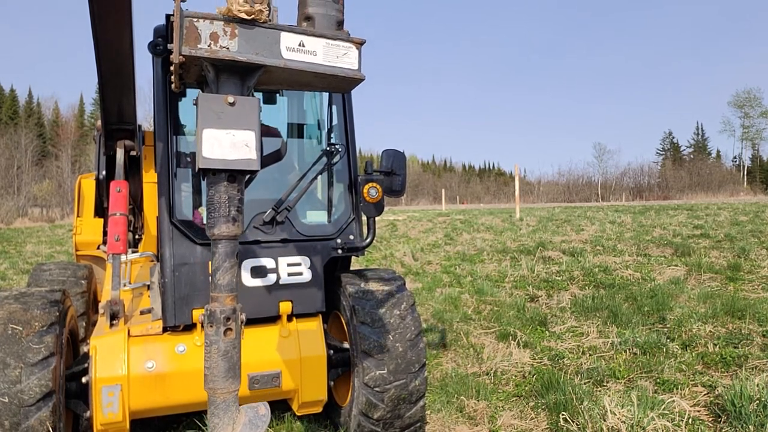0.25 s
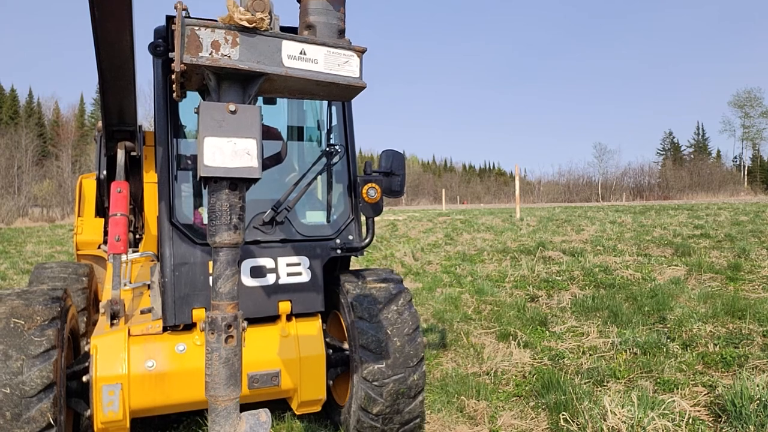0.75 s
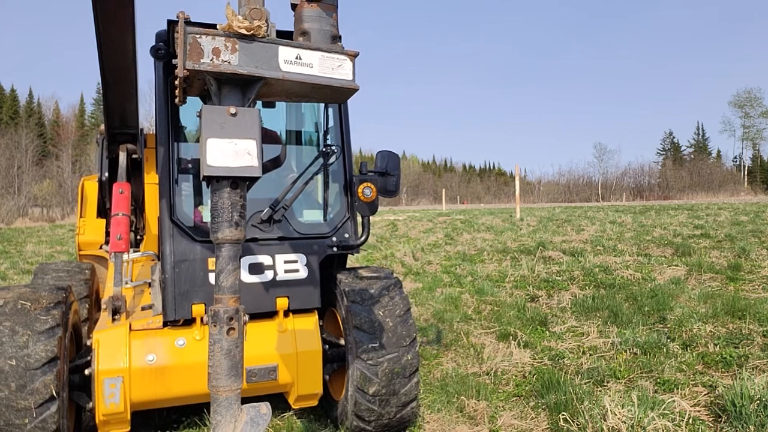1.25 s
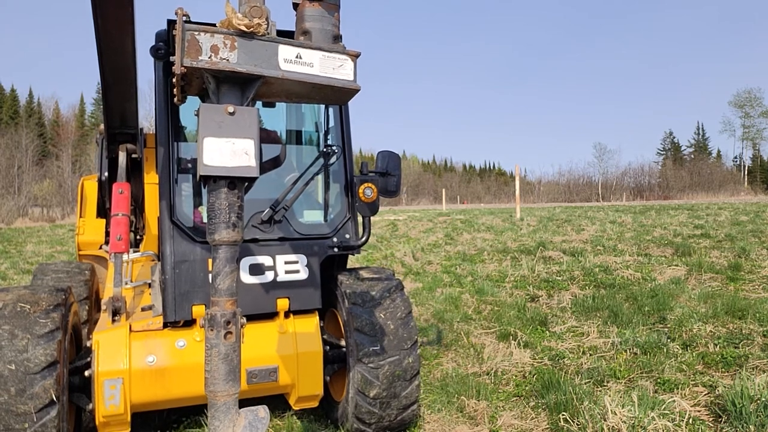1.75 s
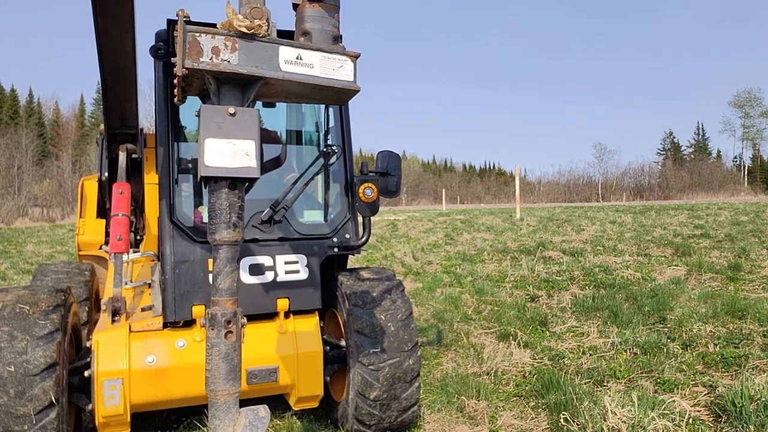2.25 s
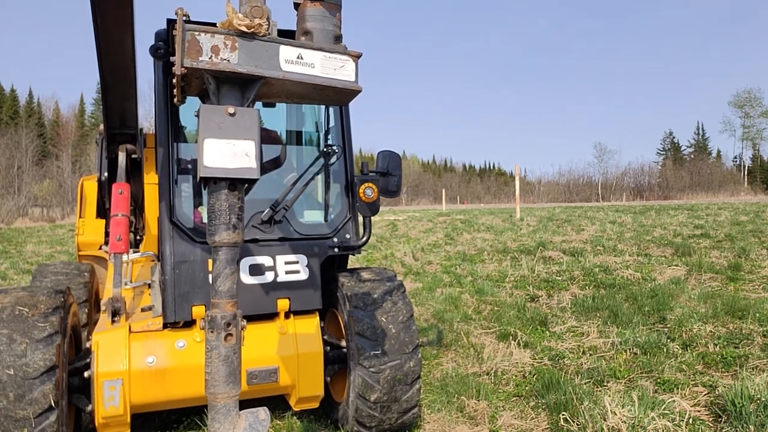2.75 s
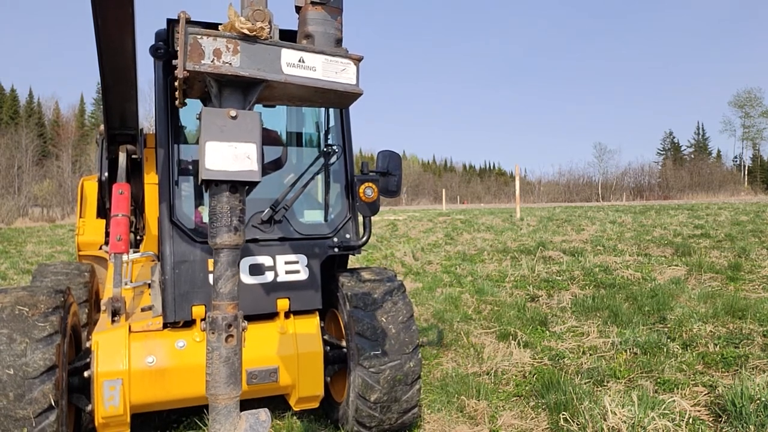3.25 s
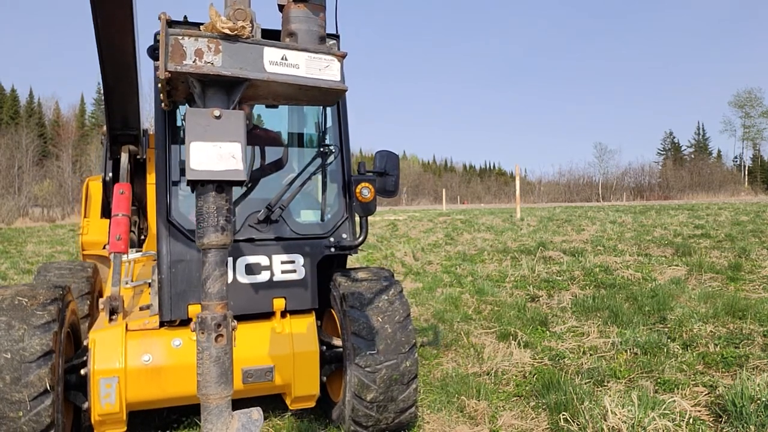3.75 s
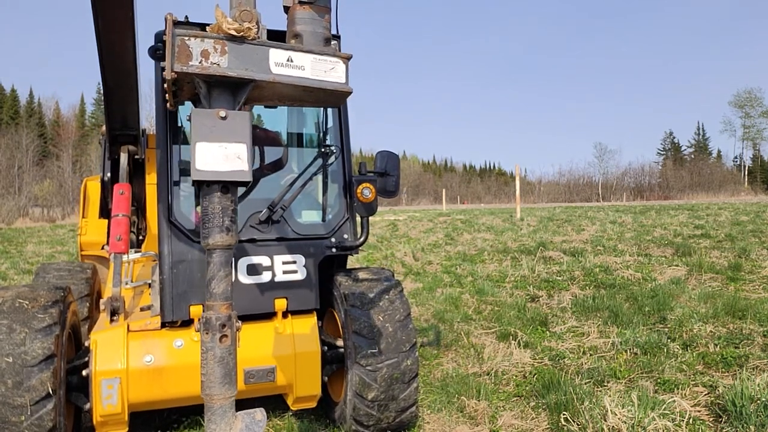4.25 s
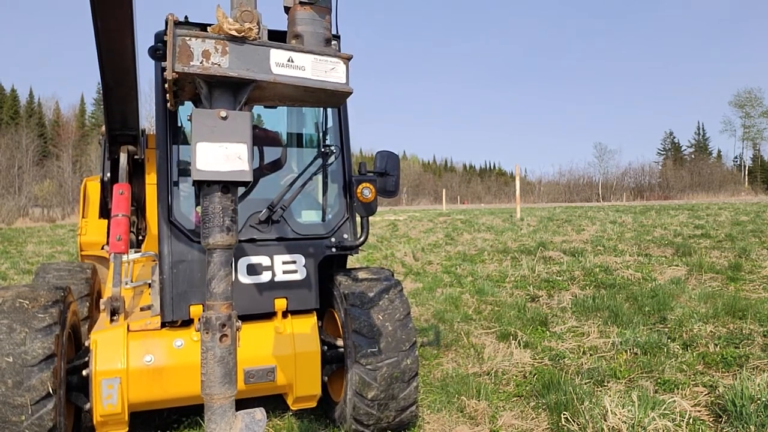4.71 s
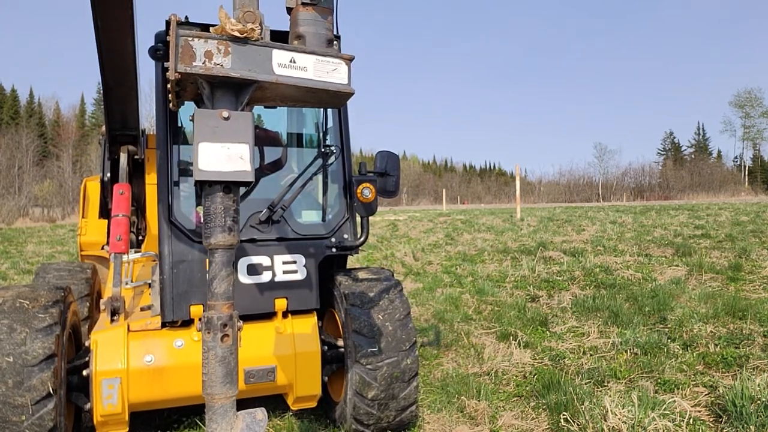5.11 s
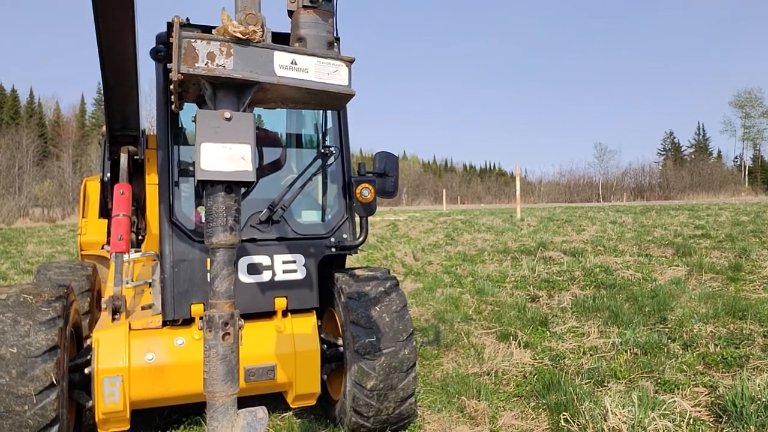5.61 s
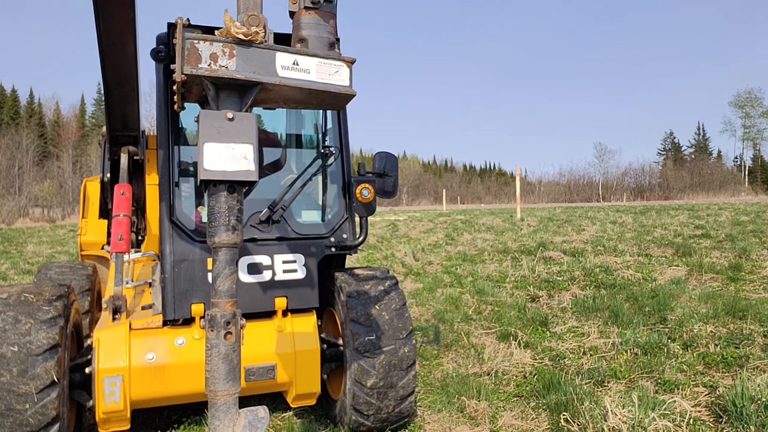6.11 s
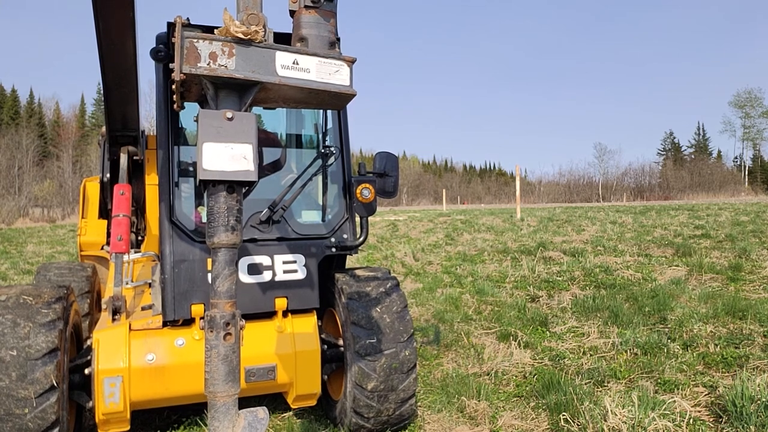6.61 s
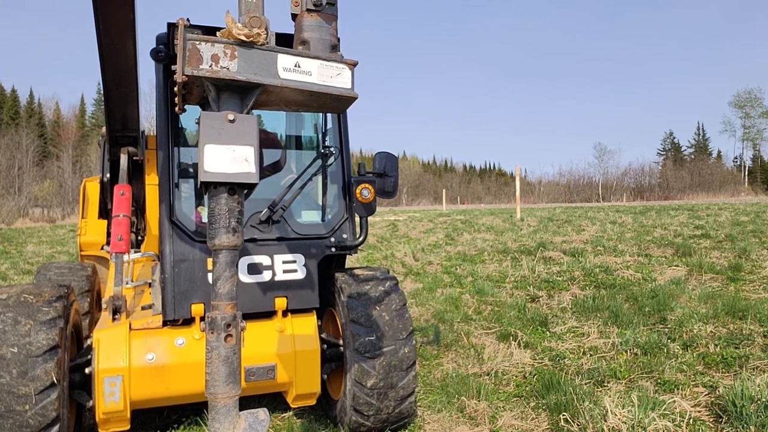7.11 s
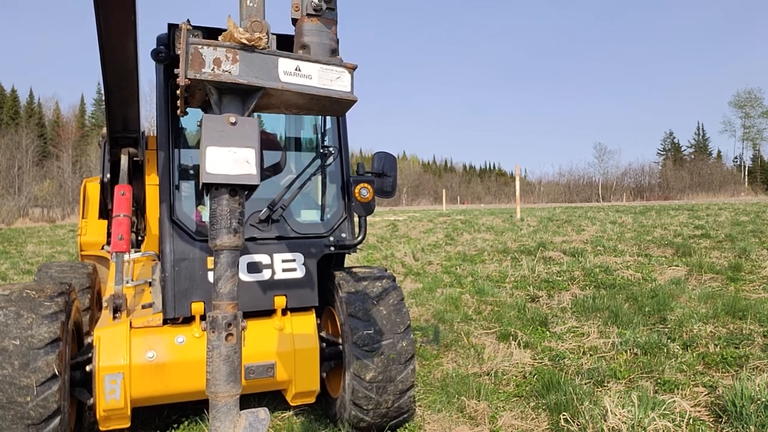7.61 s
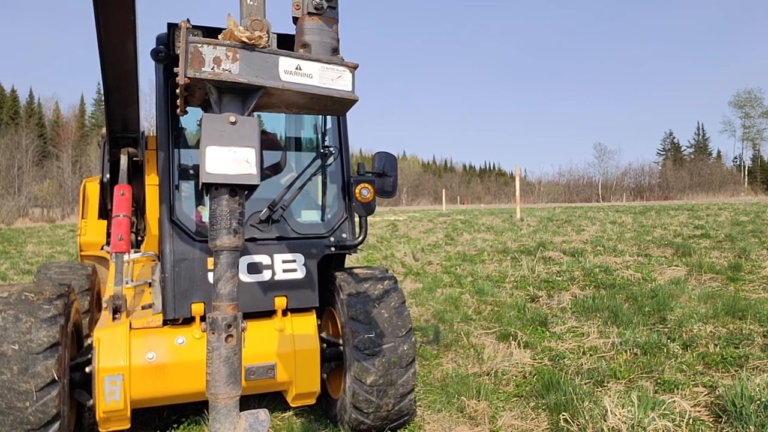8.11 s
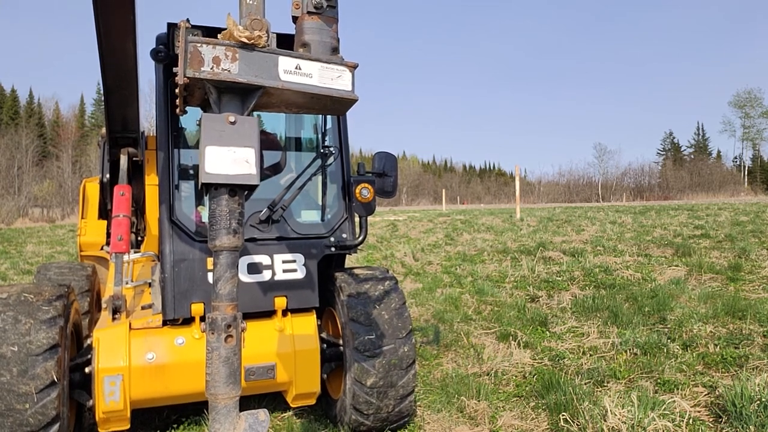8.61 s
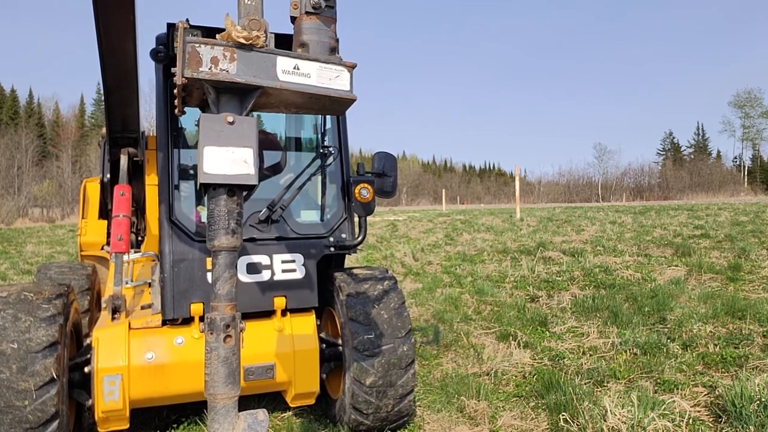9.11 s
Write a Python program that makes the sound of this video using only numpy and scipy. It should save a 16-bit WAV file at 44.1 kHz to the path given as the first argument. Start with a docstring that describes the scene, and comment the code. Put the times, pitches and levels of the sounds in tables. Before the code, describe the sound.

Close diesel engine chugging steadily as it turns a hydraulic auger, with two early metal clanks, light rattling and faint wind.

```python
"""An open field: a skid steer's four-cylinder diesel runs close by, turning its hydraulic auger.
The exhaust throbs, the block clatters at each firing, pump and gears whine; the governor overshoots
after each sag. Oil hisses through a valve; a cooling fan and light wind lie underneath.
The hanging auger mount buzzes with the shaking and clanks twice early on, with a few fainter knocks."""
import sys
import numpy as np
from scipy import signal
from scipy.fft import rfft, irfft, next_fast_len
from scipy.io import wavfile

SR = 44100
rng = np.random.default_rng(int(sys.argv[2]) if len(sys.argv) > 2 else 0)


def pcm_store(signal):
    """Save signal as 16-bit PCM."""
    levels = np.round(np.clip(np.atleast_2d(signal), -1, 1) * 32767)
    wavfile.write(sys.argv[1], SR, levels.astype(np.int16).T)


N = 412776

# left-right coherence: f/Hz, coherence/0-1
COHERENCE = [(90, 0.86), (300, 0.83), (1000, 0.92), (2200, 0.85), (5000, 0.56), (14000, 0.34)]
# left minus right: f/Hz, level/dB
BALANCE_DB = [(85, -1.1), (130, -2.5), (500, -2), (1300, -3.5), (2500, -2.5), (4000, -4.5), (6300, -1.5),
              (7700, -5.5), (9000, 2), (13000, 0.5)]
# governed speed: t/s, speed/rpm
GOVERNED_RPM = [(0.28, 1253.3), (2.2, 1277.8), (5.45, 1275), (6.2, 1285.4), (7.12, 1275.2), (7.91, 1285.9),
                (8.4, 1274.2)]
# load sags: pick-up t/s, half length/s, depth/rpm
LOAD_SAGS = [(1.1, .2, 20.3), (1.84, .23, 9.6), (3.88, .16, 20), (7.32, .21, 9.2)]
# noise spectra: f/Hz, relative density/dB
WIND_SPECTRUM = [(12, -20), (25, -17), (35, -28), (48, 7.5), (70, -9.5), (105, 1.5), (160, -8.5)]
VALVE_SPECTRUM = [(3000, 1), (6000, 1), (9000, 0.5), (11500, -6), (15500, -5)]
HISS_SPECTRUM = [(1500, -8), (2500, 8), (3200, 2.5), (4000, -3), (4900, 5), (5600, 2), (6200, -1.5),
                 (7000, 0.5), (7900, 3.5), (8600, -14.5), (10400, -6.5), (12000, -8.5), (14700, -11),
                 (15600, -11)]
RUMBLE_SPECTRUM = [(50, -24), (85, -15), (130, -3.5), (165, -10.5), (210, -11), (260, -7), (320, -12.5),
                   (385, -14.5), (480, -17.5), (800, -32)]
BLOCK_SPECTRUM = [(350, -36), (500, 1.5), (690, 3.5), (850, -1), (1000, -1), (1150, 0), (1380, -0.5),
                  (1540, -1), (1700, 1), (1860, 1), (2020, -5.5), (2250, -2.5), (2600, -15.5),
                  (4000, -12.5)]
CRACK_SPECTRUM = [(300, -16), (700, -7.5), (1500, 6), (2700, -5), (4200, -5.5), (5600, -2.5), (7800, 0),
                  (9000, -9), (12000, -11), (16000, -21)]
SHUDDER_SPECTRUM = [(250, -4), (650, -8.5), (1000, -8.5), (1500, -13), (2100, -7), (3000, -14), (6000, -23)]
# fan blade tone: t/s, f/Hz, level/dB
FAN_TONE = [(0.0, 440, -36), (0.02, 435.7, -41), (1.12, 439.3, -37.5), (2.66, 429.4, -46.5),
            (4.04, 440, -38), (5.03, 439.4, -40), (8.7, 435, -39.5), (9.31, 437.4, -38.5),
            (9.36, 447.1, -34)]
# steady hum: f/Hz, level/dB
HUM_TONES = [(300, -43), (450, -52)]
# valve openings: t/s, length/s, level/dB
VALVE_OPENINGS = [(-.1, 1.27, -47), (2.778, 0.42, -51), (6.951, .6, -52)]
# pump and drive tones: order (multiple of the four-stroke cycle rate, rounded in use), level/dB,
# lug slope/(dB/rpm), surge gain/dB, waver/dB
PUMP_TONES = [(36, -50.5, 0.4477, 5, 3.5), (42, -60.5, 0.27, 8, 3), (54, -41, -.06, 3, 1.2),
              (64.48, -55, 0.1154, 4, 6.5), (66.7, -56, .2, 0, 2.5), (68.45, -56.5, -0.08, 7, 0.5),
              (72.7, -57, 0, 16, 1.7), (92.36, -55, -0.25, 4, 2.5)]
# pump surges: t/s, half length/s, strength/0-1
PUMP_SURGES = [(.8, 0.14, 0.5), (1.7, 0.28, 0.1), (3.705, 0.23, 0.7), (5.551, 0.48, 0.9), (7.3, 0.48, 0.9),
               (9.15, .3, 0.67)]
# timing gear mesh and sidebands: order, relative level/dB
GEAR_TONES = [(120, -1), (124, 3.5), (128, 8.5), (130, 2.5), (135, 5)]
# gear cover modes: f/Hz, t60/s, level/dB
COVER_MODES = [(1403, 0.011, -48.5), (1856, 0.027, -48.5)]
# loose fitting modes: f/Hz, t60/s, relative level/dB
FITTING_MODES = [(4750, 0.033, 5), (5084, 0.013, 6), (5127, 0.016, 5), (4190, 0.0065, -3),
                 (6500, 0.0065, -6.5), (7770, 0.0045, -3)]
# buzz of the fittings: t/s, base level/dB
BUZZ_DB = [(0, -48.5), (2.2, -44.5), (4.4, -47), (6.2, -48.5), (8, -49.5), (9.2, -46)]
# harder taps of the fittings: t/s, relative level/dB
FITTING_TAPS = [(.409, -40), (0.601, -38), (2.2127, -41), (3.1, -43), (4.6766, -40.5), (4.82, -38),
                (5.3355, -42.5), (5.407, -41), (8.9712, -39), (9.2039, -41)]
# auger linkage knocks: t/s, relative level/dB, low ring and shudder gain/dB, crack t60/s
LINKAGE_KNOCKS = [(0.7873, -14, -1.5, 0.058), (1.1974, -34, 2, 0.084), (1.2247, -30.5, 5, 0.039),
                  (1.273, -34, 0, 0.042), (1.3872, -17, -6, 0.054), (2.8673, -31.5, 1.5, 0.041),
                  (5.866, -33.5, -1, 0.058)]
# steel mount modes: f/Hz, t60/s, relative level/dB
MOUNT_MODES = [(762, 0.64, -16), (1233, 0.26, -9), (1300, 0.58, -11.5), (1530, 0.11, -2), (1646, 0.13, -6),
               (1850, 0.13, -5.5), (2090, 0.057, -19), (4710, 0.11, -15), (4900, 0.046, -25),
               (6050, 0.031, -18), (7150, 0.039, 0.5), (7700, 0.038, -3)]
# knock per cylinder, in firing order: relative level/dB, before weighting
CYLINDER_DB = [-3.5, -4, -3, -2]
# exhaust tones: order, relative level/dB
EXHAUST_TONES = [(4, -16.5), (7, -19.5), (8, -1), (11, -13), (12, 1.5), (13, -8.5), (15, -9), (16, -14),
                 (17, -17), (19, -21.5), (21, -30), (23, -19), (24, -42), (25, -9.5), (26, -24.5),
                 (32, -30), (38, -30.5), (40, -29.5), (47, -28.5)]
# swell of the strongest exhaust tone: t/s, relative level/dB
THROB_DB = [(0.3, -18), (1.0, -21), (1.25, -18.0), (2.0, -17.5), (2.6, -17.5), (3.15, -18.5), (3.45, -17),
            (4.4, -17), (5.05, -20), (5.45, -17), (8.0, -16.5), (8.7, -22), (9.2, -20)]


def from_db(db):
    """Decibels to gain."""
    return 10 ** (np.asarray(db) / 20)


def unit_rms(x):
    """Scale to rms 1."""
    return x / np.sqrt(np.mean(x ** 2) + 1e-20)


def per_sample(rows):
    """Each column of a time table, at every sample."""
    times_s, *columns = np.transpose(rows)
    return [np.interp(np.arange(N) / SR, times_s, column) for column in columns]


def per_bin(points):
    """A table over log frequency, at every FFT bin."""
    hz, value = np.transpose(points)
    return np.interp(np.log(np.fft.rfftfreq(next_fast_len(N), 1 / SR) + 1), np.log(hz), value)


def fft_filter(x, gain):
    """Apply one gain per FFT bin."""
    size = next_fast_len(N)
    return irfft(rfft(x, size) * gain, size)[..., :N]


def colour(x, spectrum):
    """Impose a spectrum that rolls off outside its table; rms 1."""
    (low_hz, low_db), (high_hz, high_db) = spectrum[0], spectrum[-1]
    skirted = [(low_hz / 2, low_db - 50), *spectrum, (high_hz * 2, high_db - 40)]
    return unit_rms(fft_filter(x, from_db(per_bin(skirted))))


def drift(rate_hz):
    """Smooth random wander; rms 1."""
    hop, settle = 40, 2000
    pole = np.exp(-2 * np.pi * hop * rate_hz / SR)
    white = rng.standard_normal(N // hop + settle + 2)
    slow = signal.lfilter([1], [1, -2 * pole, pole * pole], white)[settle:]
    return np.interp(np.arange(N) / hop, np.arange(len(slow)), unit_rms(slow))


def noise_pair():
    """Two independent white noises."""
    return rng.standard_normal((2, N))


def spread(pair):
    """Independent pair to left and right, less coherent in the treble."""
    coherence = per_bin(COHERENCE)
    mid = fft_filter(pair[0], np.sqrt((1 + coherence) / 2))
    side = fft_filter(pair[1], np.sqrt((1 - coherence) / 2))
    return np.array([mid + side, mid - side])


def ring(clicks, hz, t60_s):
    """One mode: a unit click starts a decaying unit sine."""
    r, w = from_db(-60 / (t60_s * SR)), 2 * np.pi * hz / SR
    return signal.lfilter([0, np.sin(w)], [1, -2 * r * np.cos(w), r * r], clicks + 1e-18)


def decay(start_s, t60_s):
    """Envelope: jump, then exponential fall."""
    age_s = np.arange(N) / SR - start_s
    return (age_s >= 0) * from_db(-60 * np.clip(age_s / t60_s, 0, 2))


def engine_rpm():
    """Each load dips the speed; the governor overshoots by as much."""
    rpm = per_sample(GOVERNED_RPM)[0]
    for at_s, half_s, depth_rpm in LOAD_SAGS:
        u = (np.arange(N) / SR - at_s) / half_s
        rpm = rpm + depth_rpm * u * np.exp((1 - u ** 2) / 2)
    return rpm


def firing(cycle, delay_strokes, depth_db, uneven_db, cylinder_weight=0):
    """Four uneven swells per cycle, each rising faster than it falls."""
    strokes = 4 * cycle - delay_strokes + 1
    angle = 2 * np.pi * strokes
    swell = np.sin(angle) + 0.25 * np.sin(2 * angle)
    index = (strokes + 0.25).astype(int)
    strength_db = uneven_db * (2 * rng.random(index[-1] + 1) - 1)[index]
    strength_db += cylinder_weight * np.take(CYLINDER_DB, index, mode="wrap")
    return unit_rms(from_db(depth_db * swell + strength_db * (1 + np.sin(angle)) / 2))


def wind(level_db=-32.5, easing_db_per_s=0.64, gust_db=4.0, gust_hz=1.04, shared=0.21):
    """An easing breeze buffets both microphone ports, partly in common."""
    air = np.sqrt(shared) * rng.standard_normal(N) + np.sqrt(1 - shared) * noise_pair()
    gain = from_db(level_db - easing_db_per_s * np.arange(N) / SR + gust_db * drift(gust_hz))
    return gain * colour(air, WIND_SPECTRUM)


def fan(waver_db=1.0):
    """Blade tone of a fan on its own motor, plus a faint hum."""
    blade_hz, level_db = per_sample(FAN_TONE)
    blades = from_db(level_db + waver_db * drift(15.0)) * np.sin(2 * np.pi * np.cumsum(blade_hz) / SR)
    hum = sum(from_db(db) * np.sin(2 * np.pi * hz * np.arange(N) / SR) for hz, db in HUM_TONES)
    return np.sqrt(2) * (blades + hum)


def valve(ramp_s=0.08):
    """Oil hisses while the valve is open."""
    t = np.arange(N) / SR
    flow = sum(from_db(db) * np.clip(np.minimum(t - at_s, at_s + length_s - t) / ramp_s, 0, 1)
               for at_s, length_s, db in VALVE_OPENINGS)
    return flow * colour(spread(noise_pair()), VALVE_SPECTRUM)


def engine_hiss(cycle, lug_rpm, level_db=-43.5, db_per_rpm=-0.0161):
    """Treble noise pulsing at each firing."""
    pulses = noise_pair() * firing(cycle, delay_strokes=0.015, depth_db=2.5, uneven_db=3.5)
    return from_db(level_db + db_per_rpm * lug_rpm) * colour(spread(pulses), HISS_SPECTRUM)


def backlash(cycle, lug_rpm, turn_db=8.0, cycle_db=2.0, peak_cycles=0.31, db_per_rpm=-0.1448):
    """Gear play rattles the cover once per crank turn, harder every second turn."""
    angle = 2 * np.pi * (cycle - peak_cycles)
    contacts = spread(noise_pair()) * from_db(turn_db * np.cos(2 * angle) + cycle_db * np.cos(angle))
    cover = sum(from_db(db) * unit_rms(ring(contacts, hz, t60_s)) for hz, t60_s, db in COVER_MODES)
    return from_db(db_per_rpm * lug_rpm) * cover


def gears(cycle, lug_rpm, level_db=-43.0, db_per_rpm=-0.5, peak_cycles=0.357, waver_db=2.0):
    """Timing gears sing, meshing hardest once per crank turn; load quiets them."""
    angle = 2 * np.pi * (cycle - peak_cycles)
    mesh = sum(from_db(db + waver_db * drift(4.9)) * np.cos(order * angle) for order, db in GEAR_TONES)
    torque = 1 + 0.28 * np.cos(2 * angle)
    return from_db(level_db + db_per_rpm * np.maximum(lug_rpm, 0)) * unit_rms(mesh * torque)


def hydraulics(cycle, lug_rpm, drone_db=-40.5, drone_waver_db=2.2, beat_db=13.5, beat_s=3.73, top_s=0.22):
    """Piston pump and drive whine, varying with load and surges; the drive's drone beats slowly."""
    t = np.arange(N) / SR
    surge = sum(strength * np.exp(-((t - at_s) / half_s) ** 2) for at_s, half_s, strength in PUMP_SURGES)
    fade_db = beat_db * np.sin(np.pi * (t - top_s) / beat_s) ** 2
    drone = from_db(drone_db - fade_db + drone_waver_db * drift(5)) * np.sin(2 * np.pi * 33 * cycle)
    whine = 0
    for order, db, db_per_rpm, surge_db, waver_db in PUMP_TONES:
        gain = from_db(db + db_per_rpm * lug_rpm + surge_db * surge + waver_db * drift(1.7))
        whine += gain * np.sin(2 * np.pi * round(order) * cycle)
    return np.sqrt(2) * (drone + whine)


def fittings(cycle, lug_rpm, db_per_rpm=-0.1124, tap_db=4.0, tap_t60_s=0.086):
    """Firings shake loose steel into tiny contacts, louder at speed, with some harder taps."""
    shaking = firing(cycle, delay_strokes=0.063, depth_db=3.5, uneven_db=8.0)
    force = from_db(per_sample(BUZZ_DB)[0] + db_per_rpm * lug_rpm) * shaking
    force += sum(from_db(db + tap_db) * decay(at_s, tap_t60_s) for at_s, db in FITTING_TAPS)
    contacts = spread(noise_pair()) * force
    rings = sum(from_db(db) * unit_rms(ring(contacts, hz, t60_s)) * (-1) ** k
                for k, (hz, t60_s, db) in enumerate(FITTING_MODES))
    return unit_rms(rings) * np.std(contacts)


def linkage(crack_db=-4.5, bounce_db=-5.5, bounce_s=0.0084, shudder_db=-4.5, ring_db=-2.5, low_hz=3000):
    """Play in the mount closes with a crack and a bounce; the arms shudder, the steel rings."""
    crack = shudder = 0
    for at_s, db, low_db, t60_s in LINKAGE_KNOCKS:
        bounce = from_db(bounce_db) * decay(at_s + bounce_s, t60_s)
        crack += from_db(db + crack_db) * (decay(at_s, t60_s) + bounce)
        shudder += from_db(db + low_db + shudder_db) * decay(at_s, t60_s=0.18)
    out = crack * colour(spread(noise_pair()), CRACK_SPECTRUM)
    out += shudder * colour(spread(noise_pair()), SHUDDER_SPECTRUM)
    at_s, db, low_db, _ = np.transpose(LINKAGE_KNOCKS)
    for hz, t60_s, mode_db in MOUNT_MODES:
        strength = from_db(db + ring_db + mode_db + low_db * (hz < low_hz))
        clicks = np.zeros(N)
        clicks[(at_s * SR).astype(int)] = strength * rng.choice([-1, 1], len(at_s))
        out += ring(clicks, hz, t60_s)
    return out


def rumble(level_db=-32.5):
    """Steady low noise under the exhaust tones."""
    return from_db(level_db) * colour(spread(noise_pair()), RUMBLE_SPECTRUM)


def block(cycle, level_db=-36.0, repeat_share=0.65, linger_hz=800):
    """Combustion knock in block and panels: part repeats every cycle, part is new."""
    patterns = rng.standard_normal((2, 4096))
    position = cycle % 1 * patterns.shape[1]
    repeating = unit_rms(np.array([np.interp(position, np.arange(len(p)), p) for p in patterns]))
    knock = np.sqrt(repeat_share) * repeating + np.sqrt(1 - repeat_share) * noise_pair()
    pulsing = knock * firing(cycle, delay_strokes=0.35, depth_db=3.5, uneven_db=2.0, cylinder_weight=1.5)
    # low panel modes ring on between firings
    lowpass = 1 / (1 + (np.fft.rfftfreq(next_fast_len(N), 1 / SR) / linger_hz) ** 4)
    clatter = fft_filter(knock, lowpass) + fft_filter(pulsing, 1 - lowpass)
    return from_db(level_db) * colour(spread(clatter), BLOCK_SPECTRUM)


def exhaust(cycle, lug_rpm, level_db=-18.5, waver_db=0.56, pulse_cycles=0.016,
            pipe_hz=165, pipe_width_hz=100, scatter_hz=480):
    """Uneven firings fill in the cycle's harmonics; the pipe's resonance shifts their phases."""
    throb_db = per_sample(THROB_DB)[0]
    throb_db -= throb_db.mean()
    out = 0
    for order, db in EXHAUST_TONES:
        hz = order * cycle[-1] * SR / N
        lag_rad = np.arctan((hz ** 2 - pipe_hz ** 2) / (hz * pipe_width_hz))
        scatter_rad = rng.normal() * (hz / scatter_hz) ** 2  # short waves arrive by many paths
        boom_band = np.exp(-((hz - 85) / 20) ** 2)
        throb_band = np.exp(-((hz - 128) / 14) ** 2)
        bark_band = np.exp(-((hz - 265) / 40) ** 2)
        load_db = lug_rpm * (0.0931 * bark_band - 0.0932 * boom_band)  # load trades boom for bark
        gain = from_db(db + waver_db * drift(1.07) + load_db + throb_db * throb_band)
        out += gain * np.cos(2 * np.pi * order * (cycle - pulse_cycles) - lag_rad + scatter_rad)
    return from_db(level_db) * unit_rms(out)


def scene(easy_rpm=1278, full_lug_rpm=25):
    """Crank angle drives engine and pump; speed lost to load (lug) colours them."""
    rpm = engine_rpm()
    lug_rpm = np.minimum(easy_rpm - rpm, full_lug_rpm)
    cycle = 0.027 + np.cumsum(rpm) / (2 * 60 * SR)  # two crank turns per cycle
    tones = exhaust(cycle, lug_rpm) + hydraulics(cycle, lug_rpm) + gears(cycle, lug_rpm) + fan()
    noise = rumble() + engine_hiss(cycle, lug_rpm)
    clatter = block(cycle) + backlash(cycle, lug_rpm) + fittings(cycle, lug_rpm)
    return tones + noise + clatter + valve() + linkage() + wind()


def record(dry, left_lag_s=0.00018, cutoff_hz=15900):
    """The left port hears the machine later and mostly softer; the top is cut."""
    hz = np.fft.rfftfreq(next_fast_len(N), 1 / SR)
    tilt = from_db(per_bin(BALANCE_DB) / 2)
    delay = np.exp(-2j * np.pi * hz * left_lag_s)
    ports = fft_filter(dry, np.array([tilt * delay, 1 / tilt]))
    lowpass = signal.ellip(10, 0.1, 80, cutoff_hz, fs=SR, output="sos")
    return signal.sosfilt(lowpass, np.clip(ports, -1, 1))


dry = scene()
out = record(dry)
pcm_store(out)
```